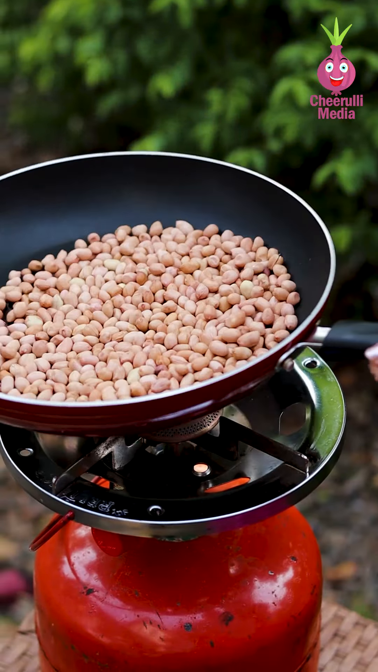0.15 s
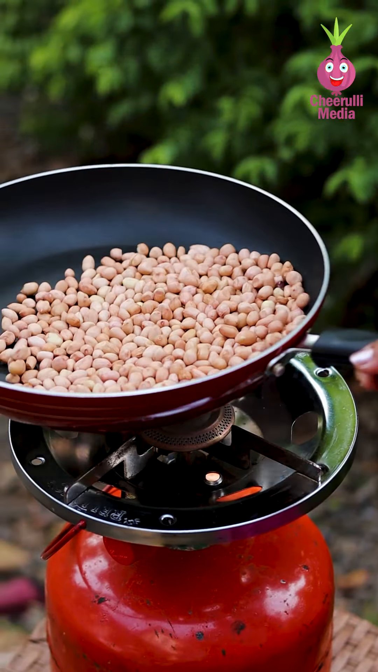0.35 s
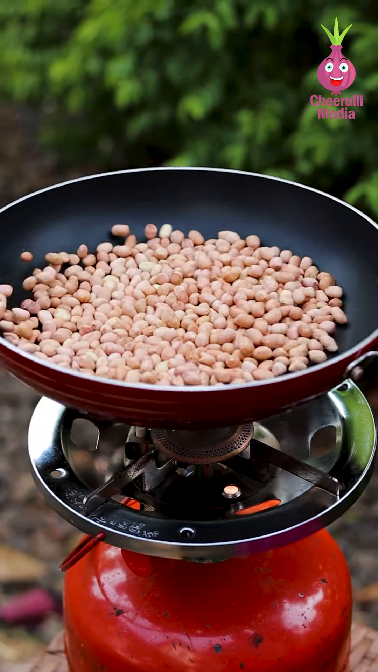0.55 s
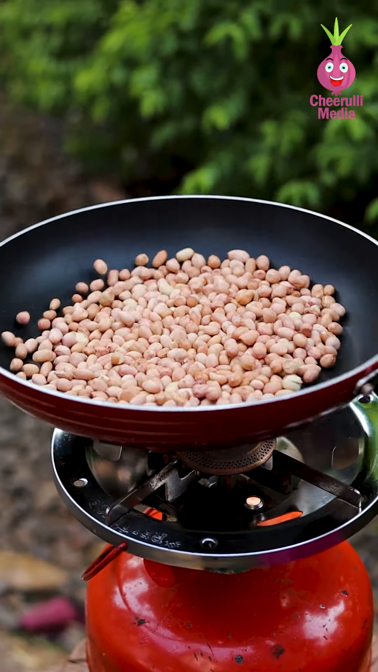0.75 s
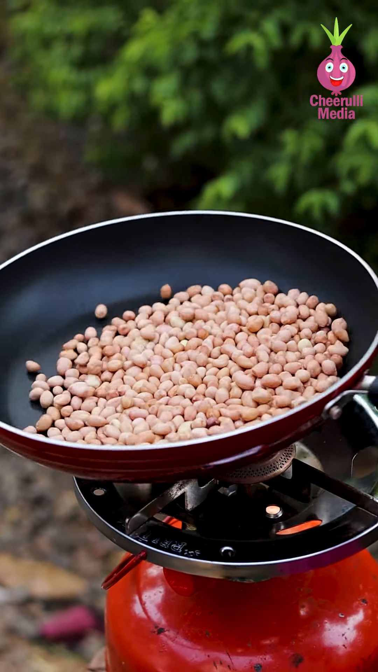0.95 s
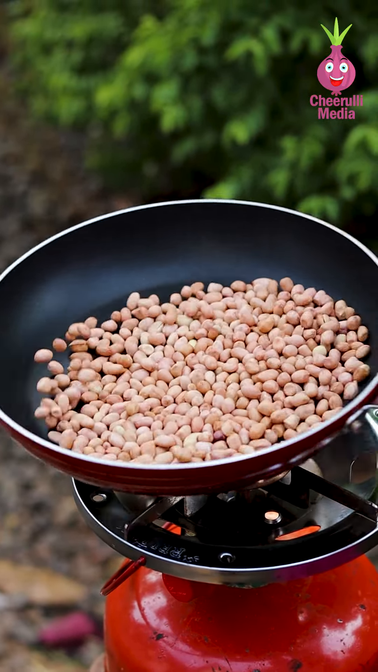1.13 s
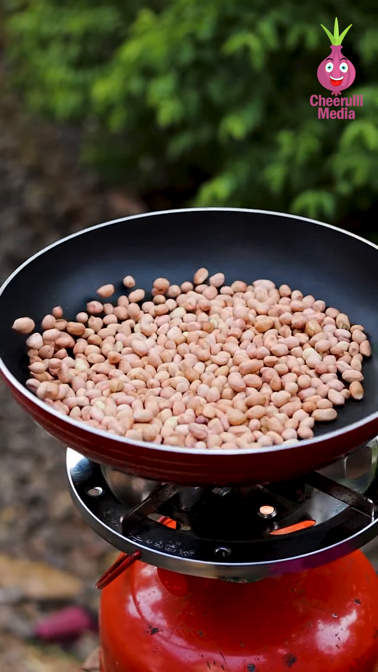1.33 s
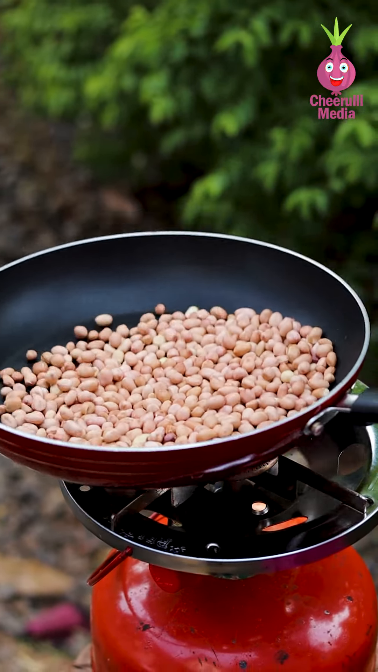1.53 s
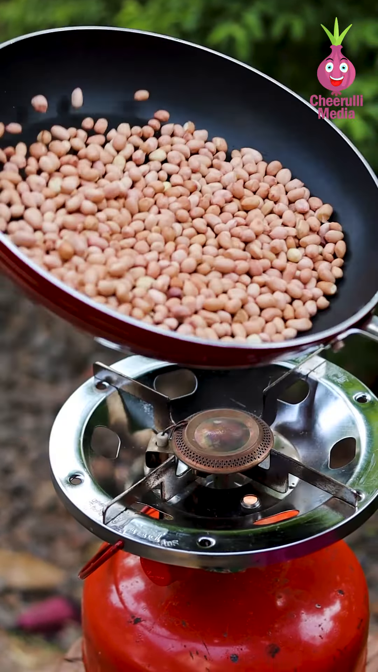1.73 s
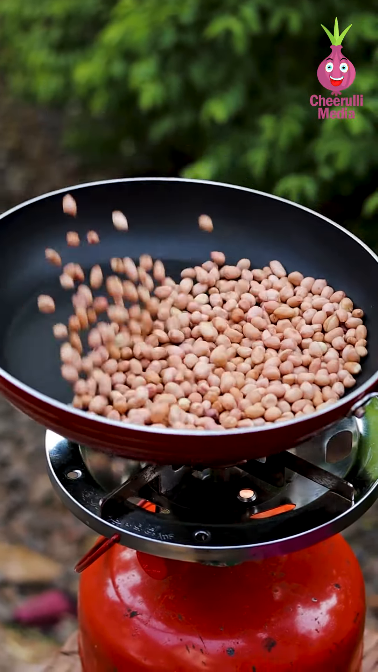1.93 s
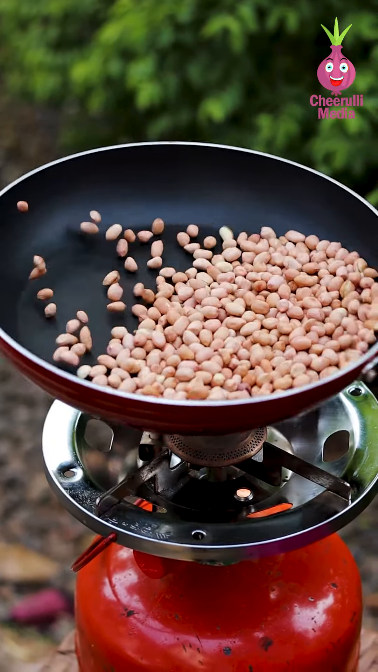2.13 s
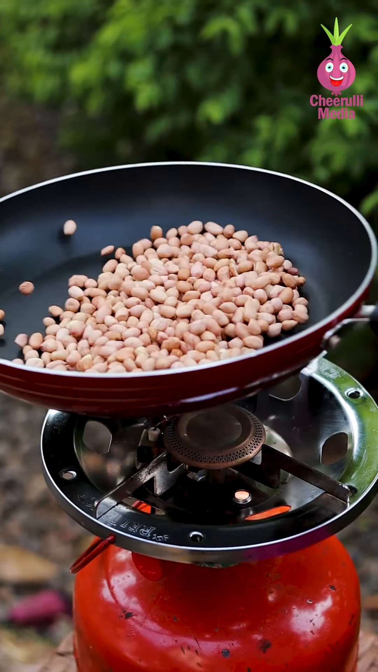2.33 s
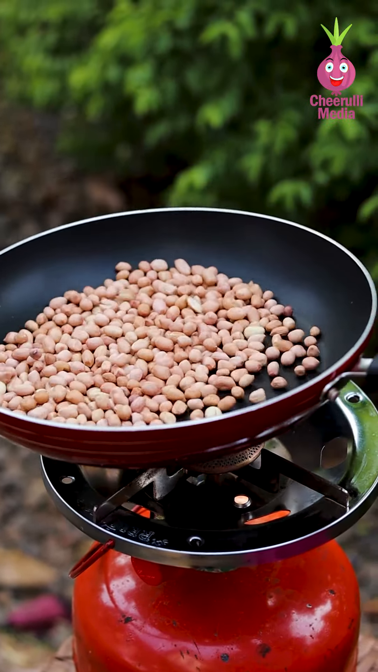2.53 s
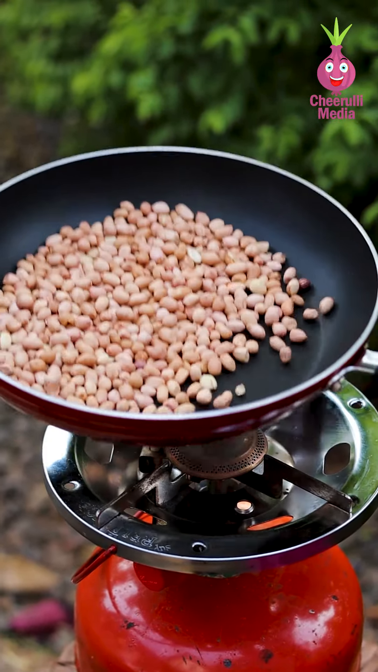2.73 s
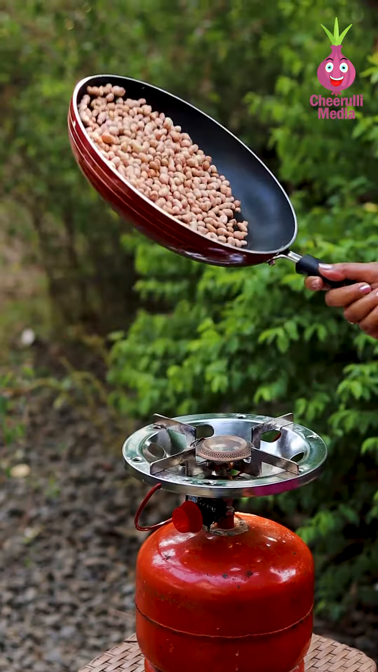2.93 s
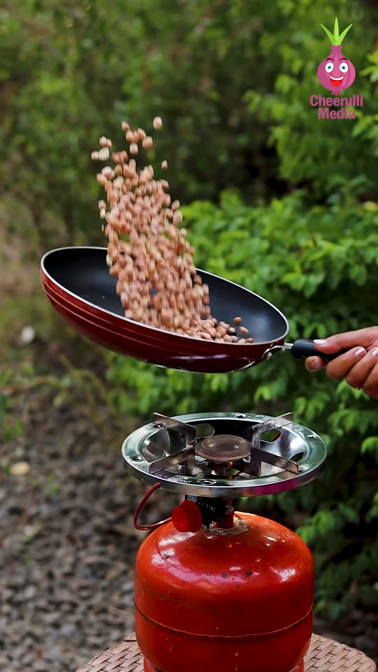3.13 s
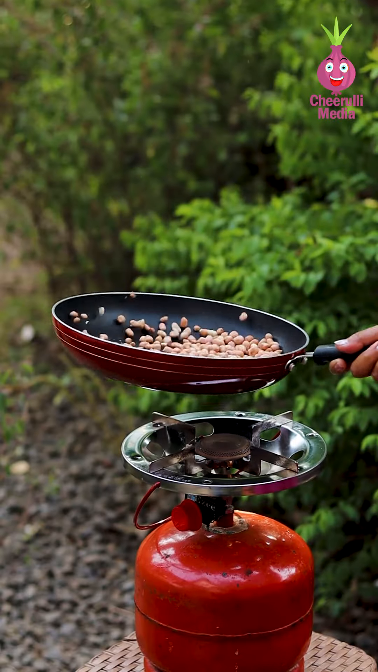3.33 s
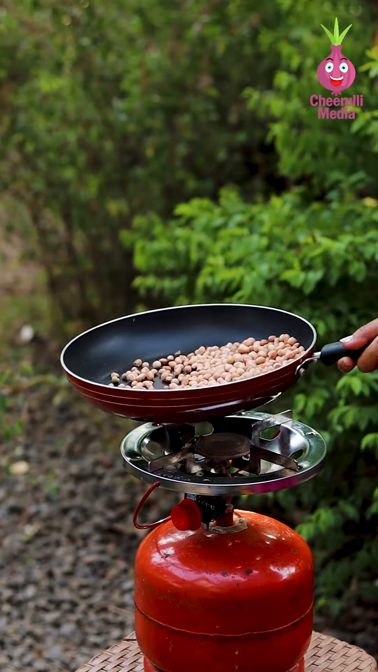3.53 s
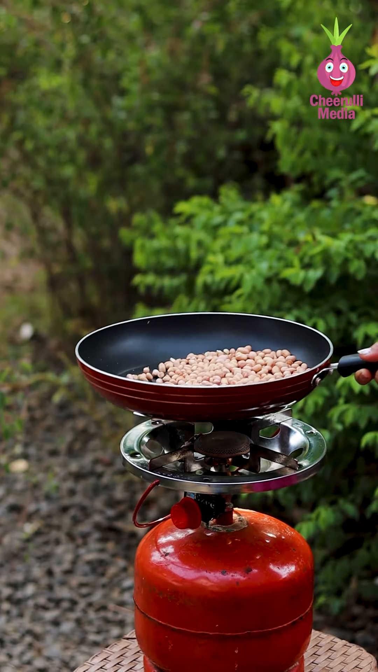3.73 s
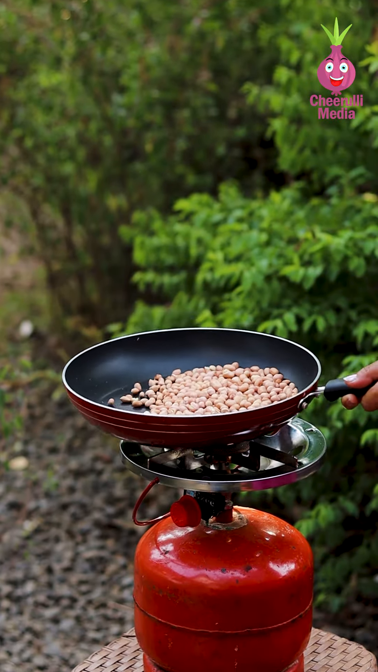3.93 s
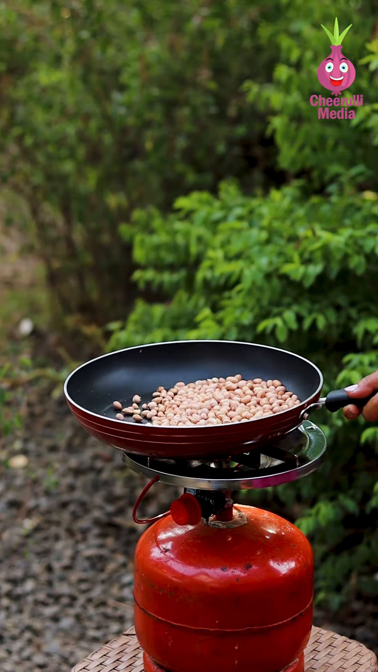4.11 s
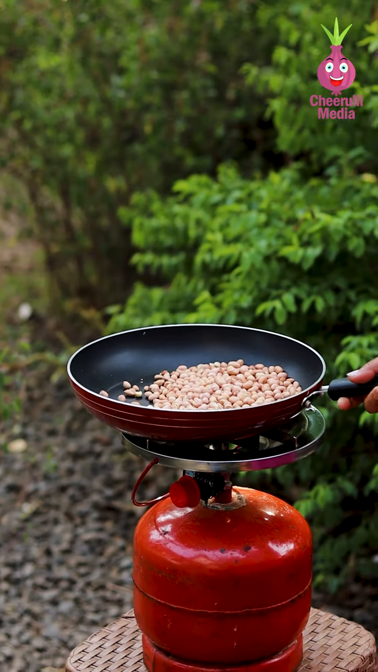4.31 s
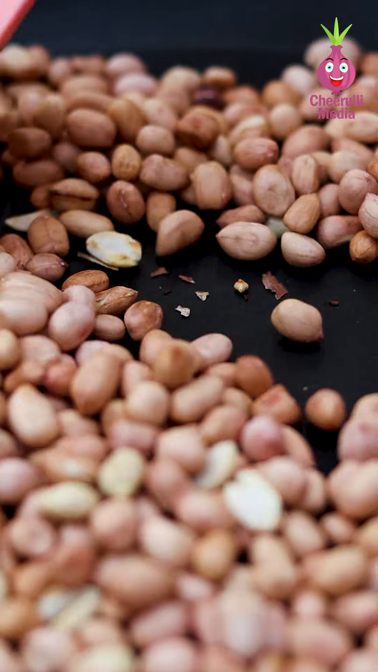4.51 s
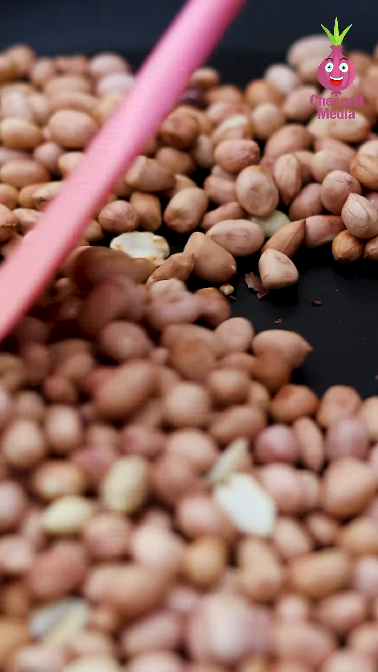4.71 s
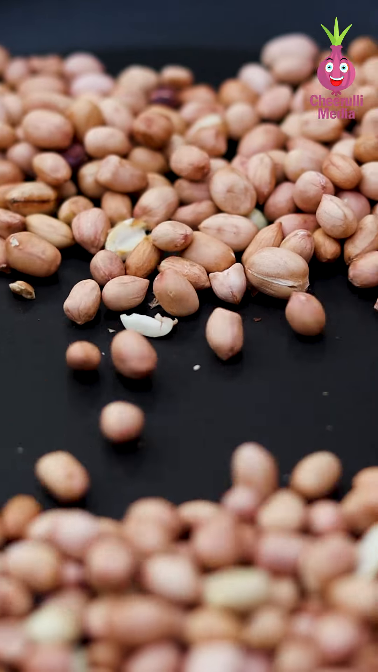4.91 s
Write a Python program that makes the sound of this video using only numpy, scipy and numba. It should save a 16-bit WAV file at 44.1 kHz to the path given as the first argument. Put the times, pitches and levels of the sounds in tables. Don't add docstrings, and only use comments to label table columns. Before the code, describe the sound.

Close, dry mono sound in an open garden. From 0 to 1.65 s, a heap of peanuts swirls in a thin hand-held metal pan, in rattling surges roughly every 0.1 to 0.2 s; countless small taps ring the metal brightly, while dry skins rustle. After a brief lull, a toss lands at about 1.95-2.1 s in a loud, crisp clattering burst. Lighter rolls and a small hop at 2.4 s thin out towards 3 s. A second big toss lands at 3.18-3.35 s, then the nuts roll and settle until about 3.9 s. The pan grazes and clanks on the steel burner support at 4.18 s and, harder, at 4.25 s, with short chatter. From 4.52 s to the end at about 5 s, a spatula stirs quietly, with short, damped nut taps and rustle. Soft flame and air noise and high insect hiss continue; a far bird chirps faintly near 1.85 and 4-4.5 s.

```python
import sys
import numpy as np
from scipy import signal
from scipy.fft import rfft, irfft
from scipy.io import wavfile
from scipy.ndimage import uniform_filter1d, minimum_filter1d
from numba import njit

SR = 44100
rng = np.random.default_rng(int(sys.argv[2]) if len(sys.argv) > 2 else 0)


def generate_wav(signal):
    frames = np.transpose(np.atleast_2d(signal))
    scaled = np.clip(frames, -1, 1) * 32767
    pcm = np.round(scaled).astype(np.int16)
    wavfile.write(sys.argv[1], SR, pcm)


N = 223332
TIME = np.arange(N) / SR

PAN_HZ = [570, 705, 742, 815, 1180, 1212, 1800, 1824, 1890, 2224, 2670, 2697, 3098, 3741, 4055, 4485, 4915,
          5555, 6013, 6213, 6710, 6960, 7620, 8050, 9105, 9400, 10600, 11900, 13100]
# width in Hz (wider dies faster), level in dB.
PAN = [(50, -43), (26.1, -7), (29.2, -6), (28.8, -12), (20.4, -8), (21.3, -7), (35, -5), (12, 2.5),
       (45.4, -7), (22.3, -12), (30.3, -10.5), (14.7, -2.5), (13.5, -16), (23.3, -6.5), (16.8, -11.5),
       (30, -22.5), (30.2, -15.5), (28, -22), (25.3, -33), (30, -22.5), (30, -54), (45, -32), (30, -29.5),
       (90, -28), (34.6, -37), (70, -52.5), (40, -35), (69.6, -52), (90, -49)]

# start in seconds, hold in seconds, pan ring in dB, tap hardness in dB per octave, skin rustle in dB.
SWIRLS = [(.02, 0.029, -27, -3, -49), (.17, 0.046, -28.5, -1.5, -50), (.3, 0.045, -28.5, 0, -50),
          (.45, 0.037, -23, -0.5, -49.5), (.56, 0.053, -26, -1, -49), (.745, 0.022, -20.5, -0.5, -47),
          (.85, 0.015, -25, -3.5, -48.5), (.98, 0.056, -23, -1.5, -49), (1.09, 0.04, -23.5, 1, -49.5),
          (1.26, 0.019, -21, -0.5, -49), (1.34, 0.043, -23.5, -2, -48), (1.53, 0.013, -22, -0.5, -49),
          (1.65, 0.027, -42, 9, -61)]
LANDINGS = [
    (1.591, 0.011, -32.5, 1, -58),
    (1.93, 0.03, -23, 0, -58),
    (1.961, 0.072, -10.5, -1.5, -42),
    (2.038, 0.051, -13.5, 3.5, -40.5),
    (2.408, 0.053, -25, 3.5, -54),
    (3.176, 0.019, -14, -1, -45),
    (3.21, 0.065, -8, -2.5, -39.5),
    (3.32, 0.042, -14, -1.5, -42),
]
ROLLS = [(2.15, 0.022, -24.5, 0, -62), (2.329, 0.032, -22.5, -0.5, -58), (2.26, 0.046, -35, -6, -54),
         (2.47, 0.052, -25, -5.5, -51), (2.598, 0.041, -25, -0.5, -62), (2.7, 0.031, -32, -7.5, -60),
         (2.83, 0.032, -31.5, -3, -58), (2.95, 0.015, -43.5, -6, -65), (3.41, 0.061, -24.5, -1, -54),
         (3.52, 0.11, -27, -3, -54.5), (3.65, 0.063, -25.5, -2.5, -56), (3.74, 0.027, -36, -14, -56),
         (3.84, 0.017, -28.5, -2, -57), (3.885, 0.024, -38, -10, -59)]
STIRS = [
    (4.524, .02, -33, 0, -67),
    (4.62, 0.033, -36, 0, -64),
    (4.75, 0.1, -35.5, 0.0054, -53),
    (4.86, 0.023, -36, 0, -50),
    (4.925, 0.04, -34, 0, -47),
    (5.01, .04, -36, 0, -66),
]
SWIRL_RAMP, LANDING_RAMP, ROLL_RAMP, STIR_RAMP = (207, 215), (2300, 215), (194, 202), (600, 108)


def undb(db):
    return np.exp(np.asarray(db) * np.log(10) / 20)


def unit(x):
    return x / np.sqrt(np.mean(x ** 2))


def bump(t, s, length):
    return np.exp(-((t - s) / length) ** 2)


def wobble(rate):
    k = int(SR / rate)
    smooth = uniform_filter1d(rng.standard_normal(N), k)
    return unit(uniform_filter1d(smooth, k))


def curves(table):
    s, *columns = np.transpose(table)
    return [np.interp(TIME, s, c) for c in columns]


def colour(x, spectrum):
    hz, db = np.transpose(spectrum)
    grid = np.linspace(1, SR / 2, 2049)
    cep = irfft(np.interp(np.log(grid), np.log(hz), db) * np.log(10) / 20)
    cep[1:2048] *= 2
    cep[2049:] = 0
    response = unit(irfft(np.exp(rfft(cep)))) / 64
    return signal.fftconvolve(x, response)[:N]


def strikes(times, sizes):
    return np.bincount(np.minimum((times * SR).astype(int), N - 1), sizes, N)


@njit
def mode(x, hz, width, load, sag):
    out, z = np.empty(len(x)), 0j
    pole = 0j
    for i in range(len(x)):
        if i % 32 == 0:
            pole = np.exp((2j * np.pi * hz * sag[i] - np.pi * width * load[i]) / SR)
        z = z * pole + x[i] + 1e-18
        out[i] = z.imag
    return out


def swell(start, hold, db, ramp):
    end = start + max(hold, 0)
    return np.interp(TIME, [start - 1, start, end, end + 1], [db - ramp[0], db, db, db - ramp[1]])


def moves(*kinds):
    power, weighted = 1e-12, 0
    for rows, ramp in kinds:
        for s, hold, db, hardness, _ in rows:
            part = undb(2 * swell(s, hold, db, ramp))
            power = power + part
            weighted = weighted + hardness * part
    ring_db = 10 * np.log10(power)
    softening = 0.13 * np.clip(-28 - ring_db, 0, 30)
    return ring_db, weighted / power - softening


def ring(times, sizes, unison, tilt_db, modes, spot_db, load, sag):
    # time in seconds, mode in Hz, boost in dB.
    toss_spots = [(2.04, 1830, -1.5), (2.04, 1195, 4.5), (2.04, 3741, 2.5), (3.27, 1195, -3),
                  (3.27, 1830, 1.5), (3.24, 3741, -5), (3.29, 2690, 3.5), (3.29, 4485, 9), (.78, 2690, 2),
                  (2.04, 725, 2.5), (3.2, 725, -1)]
    # time in seconds, mode in Hz, boost in dB.
    mode_spots = [(0.06, 2690, -11), (0.132, 725, 11), (0.14, 1195, 9), (0.17, 2690, -10),
                  (0.19, 1830, 4.5), (0.2, 725, 5.5), (0.4, 725, 5.5), (0.43, 1830, -3.5),
                  (0.49, 1830, -2), (0.51, 725, -19), (0.51, 2224, 5.5), (0.51, 3741, 4), (0.53, 1195, -4),
                  (0.63, 725, 4), (0.63, 1195, 3.5), (0.63, 1830, -10), (0.68, 1830, 6), (0.7, 725, 10),
                  (0.7, 2690, -6), (0.72, 1195, 6.5), (0.73, 1830, -2), (0.79, 1830, -4),
                  (0.79, 2690, 5.5), (0.8, 725, -8), (0.83, 1830, 3.5), (0.88, 2690, 5.5),
                  (0.89, 1830, -9), (0.91, 1195, 3), (0.94, 725, 6), (0.98, 725, -1), (0.99, 1195, -3.5),
                  (1.01, 3741, 4), (1.03, 2690, 5), (1.07, 1195, 5), (1.12, 3741, -8), (1.13, 2690, 1),
                  (1.15, 4055, 5), (1.19, 1830, -1), (1.2, 2690, 6.5), (1.21, 725, 8), (1.21, 1195, 6.5),
                  (1.29, 1195, -7), (1.3, 1830, -5), (1.31, 725, -4.5), (1.31, 3741, 7), (1.37, 2690, -4),
                  (1.41, 1830, 2), (1.46, 1195, 7), (1.47, 725, 11), (1.28, 1830, -5), (1.53, 4055, 6.5),
                  (1.54, 1195, -2), (1.58, 725, -10), (1.59, 2690, 3), (1.63, 2224, 13.5),
                  (1.92, 725, -11), (1.92, 1830, 4), (1.95, 1195, 0.5), (1.98, 2224, 6.5), (1.98, 4055, -2),
                  (2.01, 2690, -1.5), (2.03, 3741, 7.5), (2.05, 1830, -6), (2.07, 725, -2.5),
                  (2.07, 3098, 1), (2.09, 1195, -7), (2.09, 2224, -3), (2.09, 4055, 1.5), (2.12, 1830, -2),
                  (2.13, 3741, 10.5), (2.14, 725, -11), (2.17, 1195, -5.5), (2.18, 2690, 3.5),
                  (2.21, 725, -11), (2.21, 3741, 8), (2.35, 3098, 8), (2.38, 1830, -7), (2.39, 2224, 7),
                  (2.4, 1195, 5.5), (2.41, 2690, -12), (2.44, 725, -2), (2.46, 2690, 9), (2.53, 725, 5.5),
                  (2.61, 3741, 6), (2.66, 2690, 5.5), (3.16, 725, -21), (3.19, 3098, 10), (3.17, 3741, -7),
                  (3.23, 725, -1), (3.275, 4055, 6), (3.24, 1195, 6.5), (3.24, 2224, 5), (3.25, 2690, -5.5),
                  (3.26, 1830, -1), (3.29, 1195, 0.5), (3.3, 3741, 3), (3.31, 725, -3.5),
                  (3.34, 2690, -0.5), (3.35, 1830, 2.5), (3.35, 4055, 0), (3.37, 2224, 6), (3.4, 1195, 4.5),
                  (3.4, 2690, -4), (3.41, 3741, -14), (3.435, 1830, -9), (3.46, 2690, 6), (3.58, 1830, -5),
                  (3.64, 1830, -7), (3.64, 3098, 12), (3.67, 2690, -7), (3.74, 725, 3), (3.82, 1830, 4),
                  (3.93, 1830, 13),
                  (4.54, 1815, 6), (4.64, 1080, 9), (4.76, 1815, 3), (4.795, 1815, 6), (4.82, 2340, 9.5),
                  (4.83, 1333, 6), (4.89, 1333, 4.5), (4.935, 2687, 5.5), (4.96, 1815, 4.5), (4.97, 738, 1),
                  (5.01, 1080, 9.5), (5.01, 2340, 5), (4.93, 3700, -6), (.70, 3741, 1), (1.03, 1830, -2.5),
                  (2.55, 2690, 2.5), (3.98, 1830, 3.5), (3.2, 2690, 3.5)]
    press_spots = mode_spots
    toss_length_s, press_length_s, press_lead_s = 0.1, 0.023, 0.0064

    spot = rng.standard_normal((len(times), len(modes), 2))
    knots = np.arange(0, N / SR + 1, .06)
    wander = [np.interp(times, knots, w) for w in rng.standard_normal((len(modes), len(knots)))]
    spot[:, :, 0] += 0.2 * np.transpose(wander)

    out = np.zeros(N)
    for k, (hz, width, db) in enumerate(modes):
        toss_db = sum(more_db * bump(times, s, toss_length_s)
                      for s, spot_hz, more_db in toss_spots if abs(np.log(hz / spot_hz)) < .06)
        favour_db = sum(more_db * bump(times + press_lead_s, s, press_length_s)
                        for s, spot_hz, more_db in press_spots if abs(np.log(hz / spot_hz)) < .045)
        in_step = (.03 * np.maximum(favour_db, 0) + unison) * np.cos(2 * np.pi * hz * times)
        sign = np.sign(spot[:, k, 1] + in_step)
        hard_db = tilt_db * max(np.log2(hz / 1800), -.5)
        gain = undb(db + toss_db + favour_db + hard_db + spot_db * spot[:, k, 0]) * sign
        push = strikes(times, sizes * gain) * np.sqrt(width / 30)
        out += mode(push, float(hz), float(max(width, 2)), load, sag)
    return out


def nuts(motion, span, taps, modes, shell, rate, knock_db, tap_db, tick_db, low_hz, spot_db, scatter_db):
    # time in seconds, boost in dB.
    surges = [(0.988, 2), (1.038, 6), (1.966, 3), (2.009, 6.5), (2.037, 11), (2.076, 9), (2.093, 8),
              (2.106, 7), (3.198, 4), (3.224, 5.5), (3.244, 3), (3.272, 7), (3.337, 8)]
    # time in seconds, boost in dB.
    clusters = [(.024, 3), (0.159, 3), (0.182, 8), (.229, 0), (.291, 3), (.424, 3.5), (.453, 6), (.512, 8),
                (.546, 10.5), (.583, 4), (.734, 2.5), (0.748, 5), (.766, 7), (.785, 3.5), (.818, 7.5),
                (.869, -1), (1.0, 4.5), (1.095, 1.5), (1.241, 2.5), (1.27, 3), (1.497, 5.5), (1.511, 7),
                (1.553, 2), (1.592, 6), (1.628, 7), (2.053, 7), (2.148, 5.5), (2.174, 2.5), (2.3, 4),
                (2.321, 0), (2.354, 6), (2.409, 8), (2.46, 2), (2.566, 3), (2.601, 7.5), (3.378, 2.5),
                (3.414, 4), (3.455, 6), (3.699, 0.5), (3.856, 3), (4.527, 5), (4.548, 2), (4.758, 8),
                (4.793, -1), (4.832, 6), (4.856, 1), (4.886, 8), (4.927, 4), (4.726, 5), (4.968, 5),
                (5.01, 2), (5.043, 3)]
    surge_length_s, cluster_length_s = 0.0042, 0.0024
    choke_after_s, choke_length_s = 0.013, 0.0093

    (ring_db, hardness), (start, end) = motion, span
    chance = rng.random((int(rate * (end - start)), 3))
    times = start + (end - start) * chance[:, 0]
    at = np.minimum((times * SR).astype(int), N - 1)
    surge_db = sum(db * bump(times, s, surge_length_s) for s, db in surges)
    surge_db += sum(db * bump(times, s, cluster_length_s) for s, db in clusters)
    uneven_db = .4 * wobble(70)[at]
    sizes = undb(-scatter_db * np.log(chance[:, 1]))
    sizes = sizes / np.sqrt(rate * np.mean(sizes ** 2))
    sizes = sizes * undb(ring_db[at] + surge_db + uneven_db)

    load = 1 + 0.086 * np.clip((ring_db + 40) / 25, 0, 1) + 0.068 * wobble(31) ** 2
    load += np.clip((-32.5 - ring_db) / 8, 0, 1)
    choke = sum(max(db, 0) * bump(TIME[::64], s + choke_after_s, choke_length_s)
                for s, db in [*surges, *clusters])
    load += 0.06 * np.repeat(choke, 64)[:N]
    sag = 1 + 0.0022 * wobble(43)

    s, peak_db, low_db = np.transpose(taps)
    peak_db = np.minimum(peak_db, -11)
    shower = undb(14) * sizes * np.sqrt(load[at])
    tilt_db = np.r_[hardness[at], np.clip(-.3 * low_db, -6, 6)]
    unison = .03 * np.r_[np.maximum(surge_db, 0), 0 * s]
    all_sizes = np.r_[shower, undb(peak_db + tap_db)]
    pan = ring(np.r_[times, s], all_sizes, unison, tilt_db, modes, spot_db, load, sag)
    pan = signal.sosfilt(signal.butter(4, low_hz, "high", fs=SR, output="sos"), pan)

    knock = undb(knock_db) * strikes(times, sizes * np.sign(chance[:, 2] - .5))
    tick = strikes(s, undb(peak_db + tick_db))
    return pan + colour(knock + tick, shell)


def shaken_nuts():
    # time in seconds, peak in dB, low modes over high in dB.
    clear_taps = [(0.2885, -26, -20), (0.3491, -23, -24), (0.405, -26, -16), (0.7285, -11, 2),
                  (0.8733, -20, -10), (0.967, -27, -10), (1.165, -24, -21), (1.3192, -38, -9),
                  (1.5891, -11, -5), (1.699, -27, -4), (1.77, -21.5, 8), (1.921, -38, -2), (1.942, -22, 11),
                  (1.9666, -2.5, 7), (2.072, 1, -28), (2.173, -10, -16), (2.351, -17, -22),
                  (2.4078, -11, -1), (2.6358, -25, -19), (2.7393, -25, -20), (2.908, -28, -12),
                  (2.94, -30, -3), (3.062, -33, -3), (3.1745, -5, -11), (3.1968, -7, -6),
                  (3.5577, -22.5, -29), (3.8445, -17.5, -4), (3.88, -19.5, -14), (3.96, -38, -16)]
    # pitch in Hz, level in dB per Hz.
    nut_knock = [(300, -50), (600, -32), (1000, -26), (2000, 2.5), (3300, -13.5), (5000, -18.5),
                 (8000, -24), (15500, -52)]
    hand = moves((SWIRLS, SWIRL_RAMP), (LANDINGS, LANDING_RAMP), (ROLLS, ROLL_RAMP))
    return nuts(hand, (0, 4.05), clear_taps, np.c_[PAN_HZ, PAN], nut_knock, rate=4000, knock_db=26,
                tap_db=-16.5, tick_db=-7, low_hz=630, spot_db=3.5, scatter_db=2.5)


def rustle():
    lead_s, skin_ramp = 0.016, (220, 200)
    slides = [swell(s - lead_s, hold, db, skin_ramp) for s, hold, *_, db in [*SWIRLS, *ROLLS, *STIRS]]
    falls = [swell(s, hold, db, LANDING_RAMP) for s, hold, *_, db in LANDINGS]
    settle = swell(4.33, .04, -49, (400, 52))
    return np.sqrt(sum(undb(2 * db) for db in slides + falls + [settle]))


def skins():
    # time in seconds, peak in dB.
    skin_cracks = [(0.7826, -45), (0.9722, -42), (1.2481, -37), (1.3379, -44), (1.5279, -38), (1.165, -42),
                   (1.567, -44), (1.591, -42), (1.602, -42), (2.187, -44), (1.952, -34), (1.966, -35),
                   (2.008, -31), (2.028, -17), (2.0724, -27), (2.148, -40), (2.0904, -31.5), (2.108, -20),
                   (2.172, -50), (2.4064, -44), (2.631, -41), (3.1767, -38), (3.197, -32), (3.222, -32),
                   (3.232, -32), (3.2695, -37), (3.287, -36), (3.335, -33), (3.455, -37), (3.467, -31)]
    s, peak_db = np.transpose(skin_cracks)
    snaps = signal.lfilter([1], [1, -.975], strikes(s, undb(peak_db - 9)))
    gain = rustle()
    rub = gain * undb(0.94 * wobble(60) - 6)
    grit = (rub + snaps) * rng.laplace(size=N)
    soft_db = np.clip(20 * np.log10(gain + 1e-9) + 42, -10, 0)
    held = TIME < 4.1
    top, still = np.zeros(N), np.ones(N)
    for hz, (width, _) in zip(PAN_HZ, PAN):
        if hz > 6100:
            push = grit * held * undb(soft_db * np.log2(hz / 7000))
            top += np.sqrt(width) * mode(push, float(hz), float(width), still, still)
    hiss = colour(grit, [(3000, -38), (6000, -28), (9000, -5.5), (12000, -7), (15700, -6)])
    return hiss + undb(-42.5) * top


def flame_and_air():
    # pitch in Hz, level in dB per Hz.
    air_tone = [(12, -44), (40, -11), (207, -2), (563, -4.5), (684, -9.5), (1070, -13), (2910, -22),
                (3440, -20), (4410, -19), (6340, -23.5), (11100, -32), (15400, -31.5)]
    # time in seconds, level in dB.
    air_level = [(0, -48.5), (1.5, -49.5), (2.76, -49), (3.5, -52), (4.52, -53.5), (4.73, -47.5),
                 (5.06, -52.5)]
    level_db = curves(air_level)[0] + 3.5 + 0.53 * wobble(1.2)
    return undb(level_db) * colour(rng.standard_normal(N), air_tone)


def insects():
    # time in seconds, level in dB, pitch in Hz.
    swarm_course = [(0, -57, 4810), (1.7, -60, 4960), (2.8, -58, 5090), (3.17, -54, 4360), (3.9, -67, 4760),
                    (4.51, -66, 4850), (4.53, -51.5, 5000), (5.06, -50.5, 5020)]
    insect_db, hz = curves(swarm_course)
    noise = rng.standard_normal(N) + 1j * rng.standard_normal(N)
    swarm = signal.lfilter(*signal.butter(3, 400, fs=SR), noise)
    swarm = unit((swarm * np.exp(2j * np.pi * np.cumsum(hz) / SR)).real)
    return undb(insect_db - 4 + 1.3 * wobble(25)) * swarm


def far_bird():
    # start in seconds, end in seconds, start pitch in Hz, end pitch in Hz, level in dB.
    bird_notes = [
        (4.07, 4.12, 3450, 3200, -60),
        (4.435, 4.465, 2850, 2600, -58),
        (4.465, 4.512, 2470, 2430, -55),
        (4.0, 4.11, 1960, 2010, -60),
        (1.84, 1.87, 1950, 1900, -56),
        (4.37, 4.4, 3000, 2800, -62),
    ]
    out = np.zeros(N)
    flutter = undb(2 * wobble(150) + 3.5)
    for start, end, start_hz, end_hz, db in bird_notes:
        span = slice(int(start * SR), int(end * SR))
        part = (TIME[span] - start) / (end - start)
        phase = 2 * np.pi * np.cumsum(start_hz + (end_hz - start_hz) * part) / SR
        shape = np.sin(np.pi * part).clip(0) ** .6
        out[span] += undb(db) * flutter[span] * shape * np.sin(phase)
    return out


def set_down():
    # time in seconds, peak in dB, time for the chatter to fall 60 dB in seconds, low thud over crack in dB.
    contacts = [(4.175, -3.5, 0.02, -3), (4.179, -8.5, 0.063, 0), (4.178, -3.5, 0.12, -23),
                (4.186, -19, 0.3, -13), (4.193, -23, 0.13, -14), (4.246, 8, 0.096, -44),
                (4.247, -5, 0.049, -28), (4.254, -22, 0.23, -23), (4.271, -14, 0.15, -3),
                (4.279, -10, 0.055, -9), (4.288, -19, 0.1, 3.5), (4.301, -17, 0.2, -6)]
    # pitch in Hz, width in Hz, level in the first contact in dB, level in the second in dB.
    support_modes = [(370, 42, -17, -15.5), (580, 36, -0.5, -2.5), (850, 65, -5, -5), (1056, 51, -3, -8),
                     (1480, 69, -29, -6), (1946, 62, -5.5, -3), (2120, 73, -27, -13), (3240, 11, -21, -13),
                     (3760, 22, -7.5, -17), (4160, 50, -25, -25), (4920, 77, -3, -21),
                     (6240, 57, -14.5, -31), (6700, 73, -13, -21), (7780, 58, -9, -18),
                     (8000, 61, -14, -25), (9346, 56, -9, -30)]
    # pitch in Hz, level in dB per Hz.
    crack_tone = [(24, -70), (40, -17), (139, -19), (795, -1.5), (1100, 0), (2050, 5.5), (3050, -5),
                  (4120, 1), (9370, -11.5), (15400, -27)]

    crack, thud = np.zeros(N), np.zeros(N)
    after = np.arange(SR // 4) / SR
    for s, peak_db, t60, low_db in contacts:
        begin = int((s + .0012) * SR)
        span = slice(begin, begin + len(after))
        chatter = rng.laplace(size=len(after)) * undb(-60 * after / t60)
        blow = np.sign(rng.standard_normal(len(after))) * undb(-60 * after / .002)
        crack[span] += undb(peak_db) * (undb(-5.5) * blow + undb(-22.5) * chatter)
        thud[span] += undb(peak_db + 0.73 * low_db) * ((after == 0) + undb(-23) * chatter)

    still, first = np.ones(N), TIME < 4.24
    body = np.zeros(N)
    for hz, width, first_db, second_db in support_modes:
        push = thud * np.where(first, undb(first_db), undb(second_db))
        body += mode(push, float(hz), float(width), still, still)
    body = signal.sosfilt(signal.butter(2, 200, "high", fs=SR, output="sos"), body)

    graze = colour(rng.laplace(size=N), [(600, -19), (1300, 1), (1650, 6), (2100, -5), (4000, -42), (9000, -31)])
    graze_db = swell(4.146, .02, -48.5, (67, 59)) + 0.51 * wobble(40)
    graze = undb(graze_db) * (TIME < 4.515) * unit(graze)
    thump = undb(-23) * bump(TIME, 4.2475, 0.00074)
    return thump + colour(crack, crack_tone) + undb(-11) * body + graze


def stirred_nuts():
    # time in seconds, peak in dB, low modes over high in dB.
    stir_taps = [(4.5243, -29, 0), (4.61, -29, -11), (4.7092, -26, -15), (4.7562, -26, -21),
                 (4.7903, -25, -14), (4.8523, -28, -13), (4.884, -26, -3), (4.9245, -26, -5),
                 (4.954, -18, -8), (5.003, -23, -4), (5.0413, -36, -8)]
    # pitch in Hz, width in Hz, level in dB.
    resting_pan = [(738, 78, -5.5), (1080, 18, -10.5), (1333, 44, -5.5), (1424, 25, -11), (1815, 32, -1),
                   (2340, 36, -6), (2687, 24, -12), (3190, 55, -17.5), (3700, 46, -9)]
    # pitch in Hz, level in dB per Hz.
    stir_knock = [(120, -31), (250, 2), (750, -1.5), (950, -18), (1400, -6.5), (2300, 0), (2600, -10.5),
                  (5000, -21), (5800, -22), (7800, -15.5), (15500, -44)]
    return nuts(moves((STIRS, STIR_RAMP)), (4.515, N / SR), stir_taps, resting_pan, stir_knock, rate=2000,
                knock_db=35, tap_db=-14.5, tick_db=-12, low_hz=403, spot_db=4, scatter_db=3.5)


def scene():
    pan = shaken_nuts() + skins() + set_down() + stirred_nuts()
    garden = flame_and_air() + insects() + far_bird()
    return (pan + garden)[None]


def roll_off(x):
    return signal.sosfilt(signal.butter(12, 15740, fs=SR, output="sos"), x)


def record(dry):
    room_left = np.minimum(1, 1 / (np.abs(dry) + 1e-9))
    gain = uniform_filter1d(minimum_filter1d(room_left, size=221), size=111)
    top = signal.ellip(8, .2, 50, 15760, fs=SR, output="sos")
    mix = np.clip(signal.sosfilt(top, dry * gain), -1, 1)
    return roll_off(mix)


dry = scene()
out = record(dry)
generate_wav(out)
```